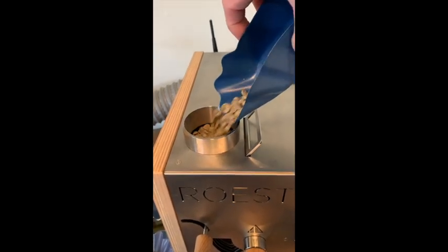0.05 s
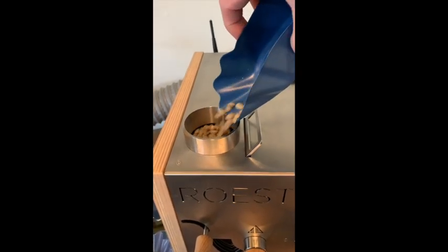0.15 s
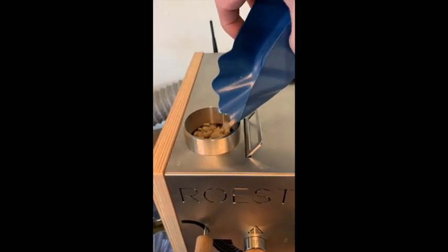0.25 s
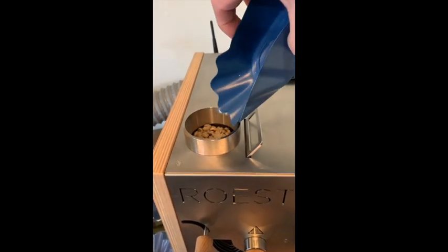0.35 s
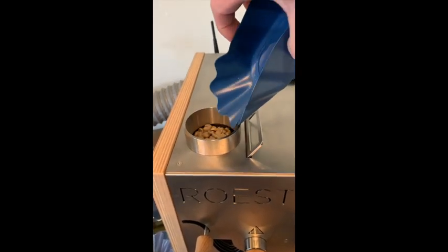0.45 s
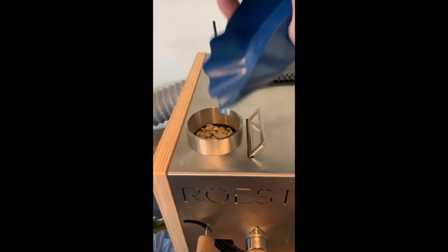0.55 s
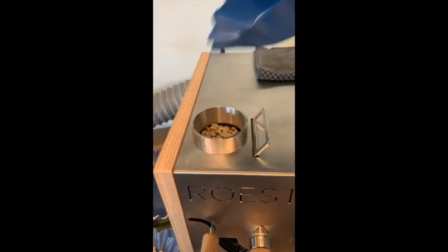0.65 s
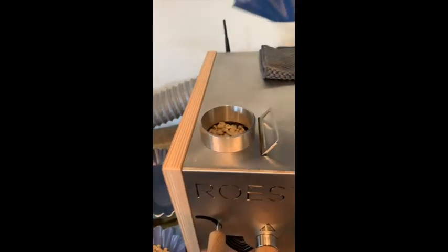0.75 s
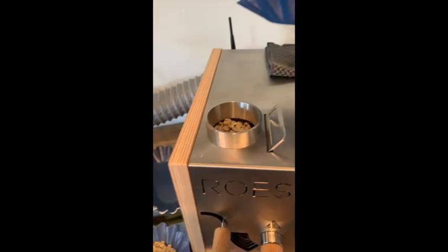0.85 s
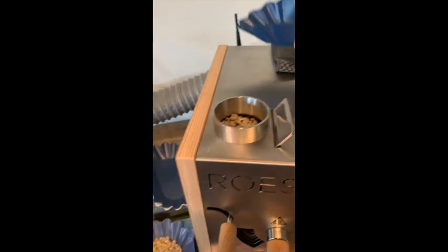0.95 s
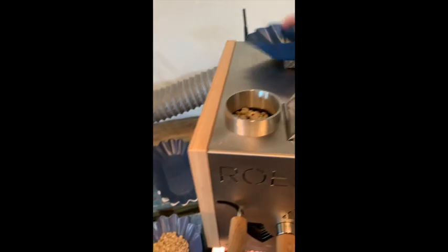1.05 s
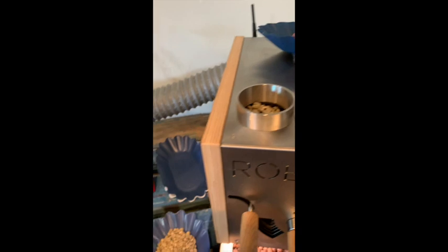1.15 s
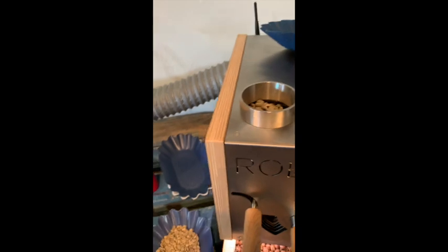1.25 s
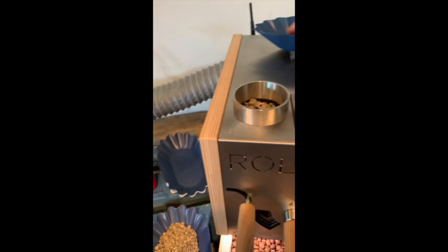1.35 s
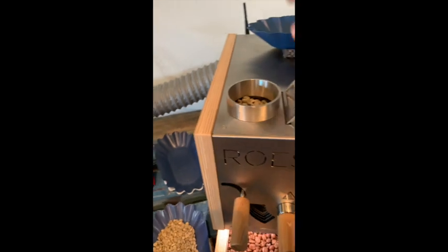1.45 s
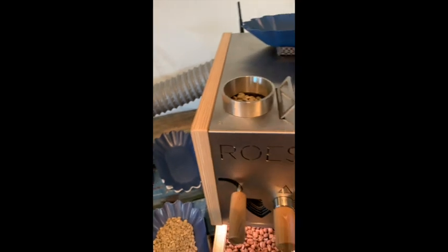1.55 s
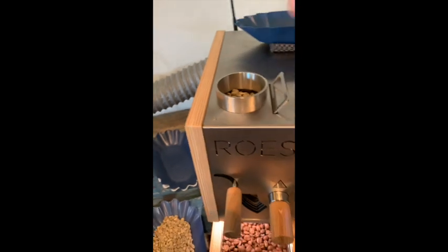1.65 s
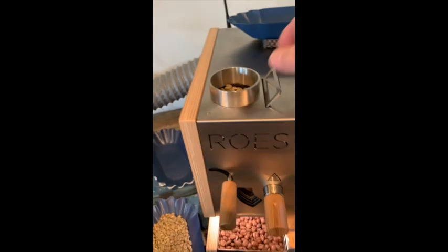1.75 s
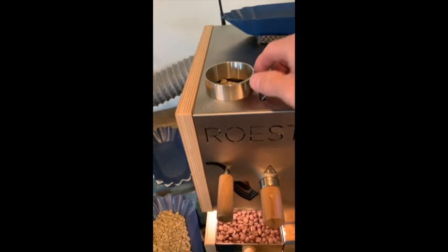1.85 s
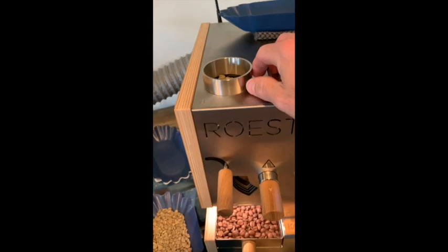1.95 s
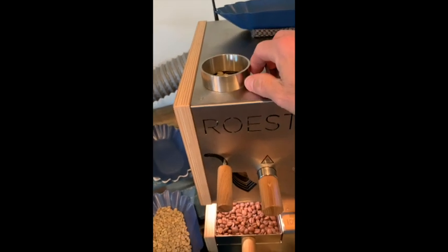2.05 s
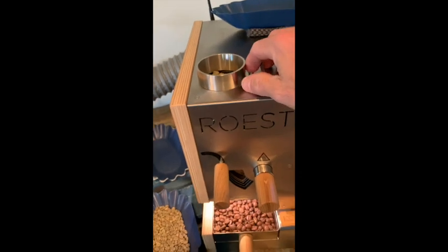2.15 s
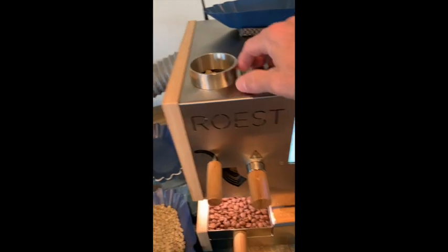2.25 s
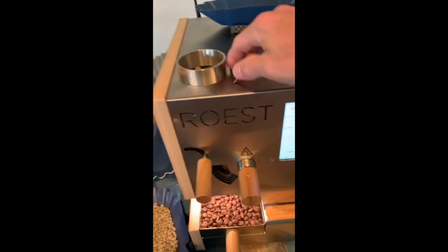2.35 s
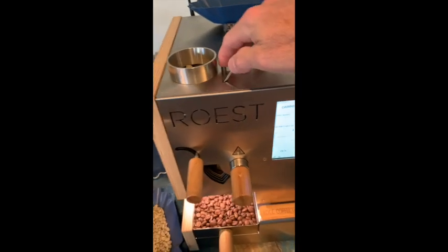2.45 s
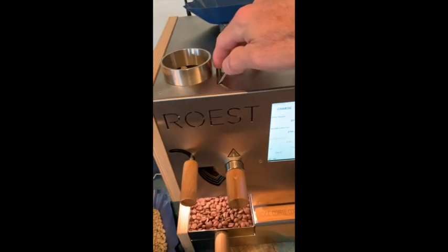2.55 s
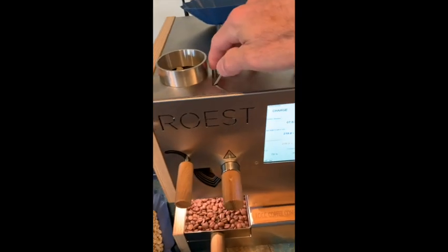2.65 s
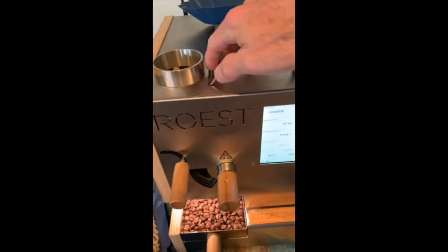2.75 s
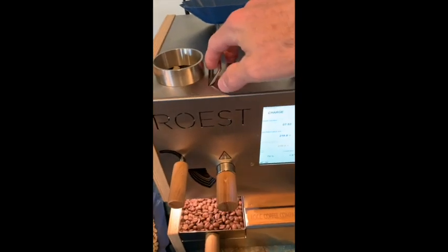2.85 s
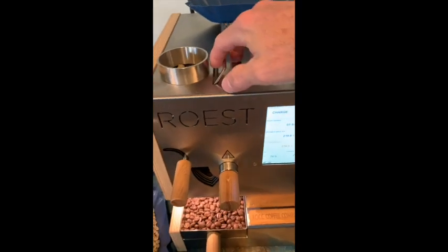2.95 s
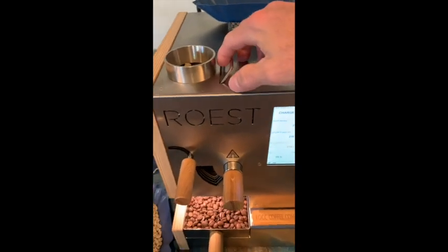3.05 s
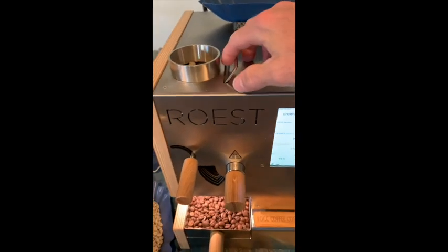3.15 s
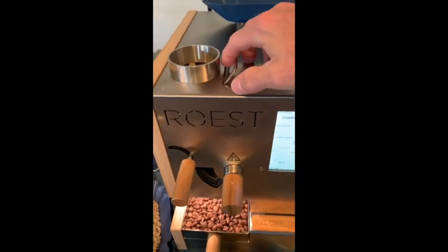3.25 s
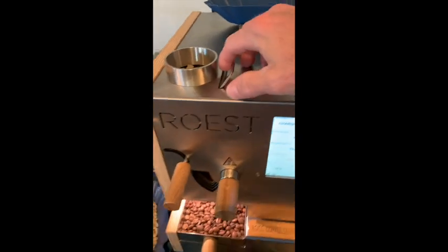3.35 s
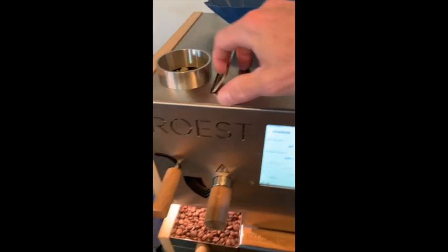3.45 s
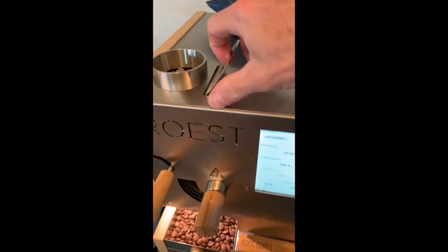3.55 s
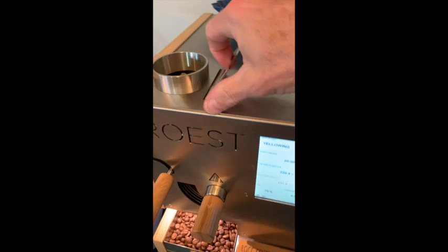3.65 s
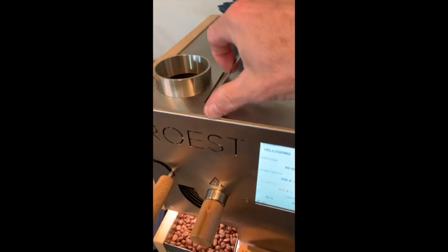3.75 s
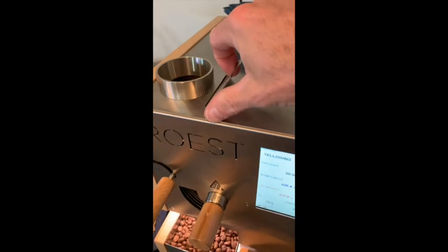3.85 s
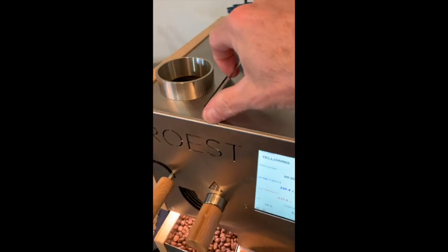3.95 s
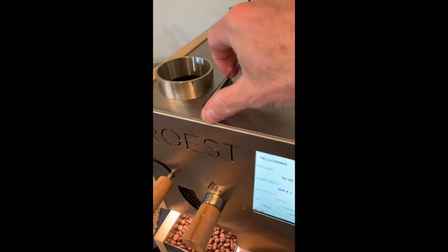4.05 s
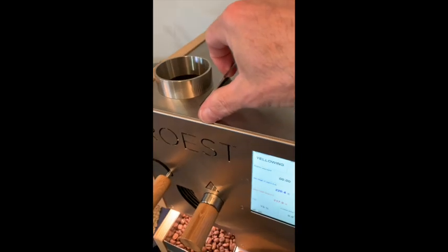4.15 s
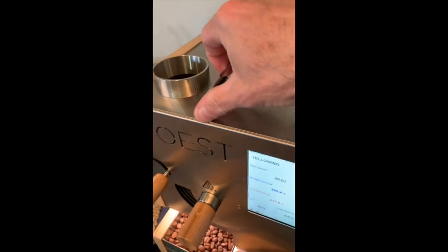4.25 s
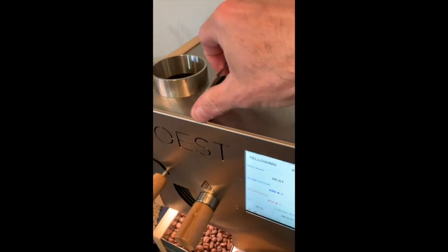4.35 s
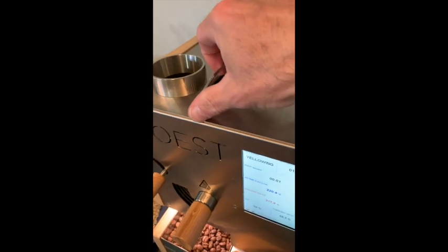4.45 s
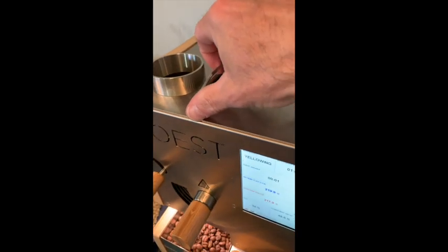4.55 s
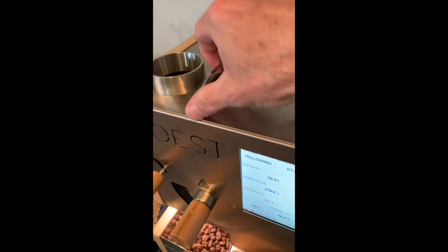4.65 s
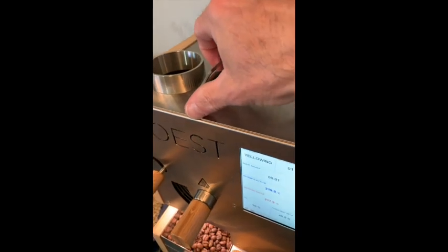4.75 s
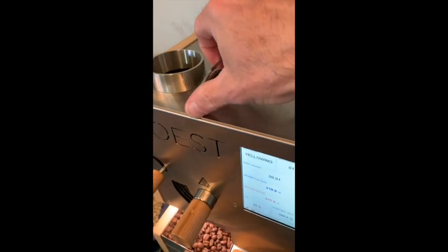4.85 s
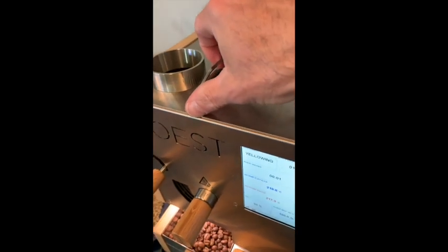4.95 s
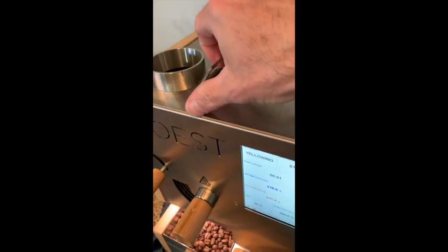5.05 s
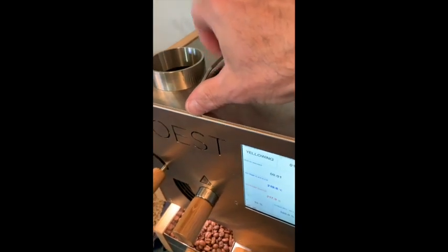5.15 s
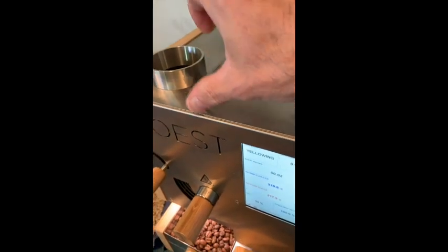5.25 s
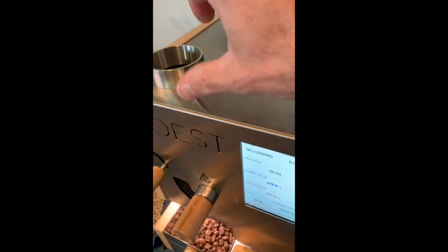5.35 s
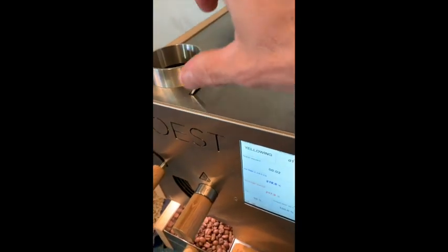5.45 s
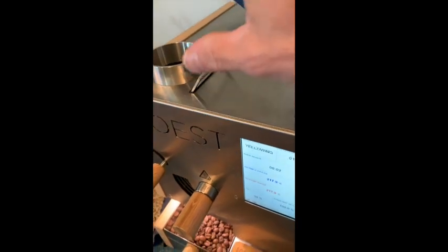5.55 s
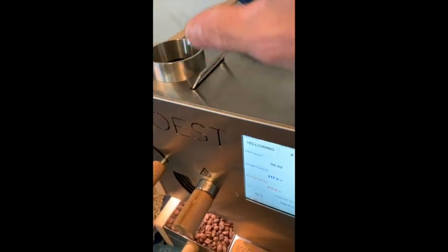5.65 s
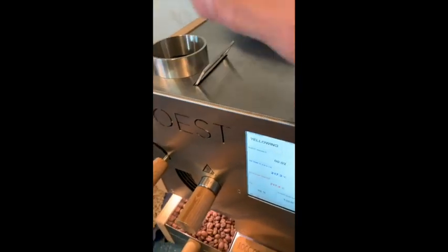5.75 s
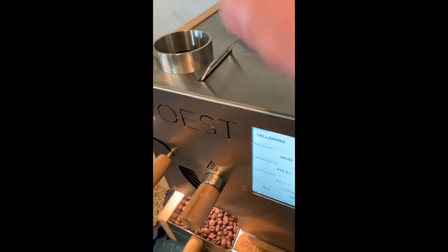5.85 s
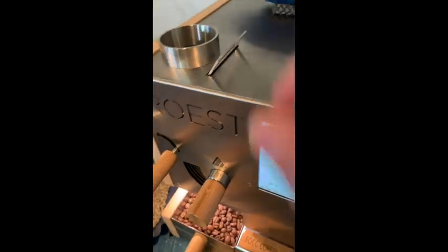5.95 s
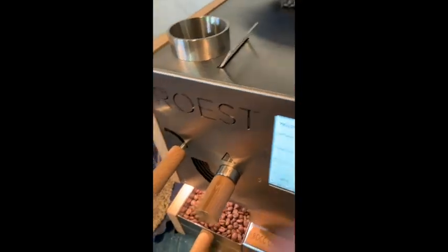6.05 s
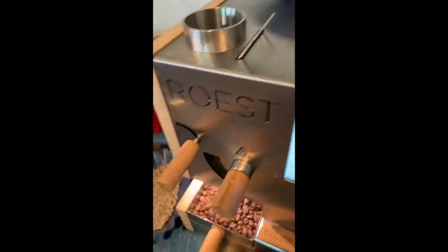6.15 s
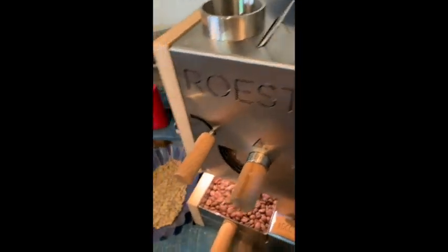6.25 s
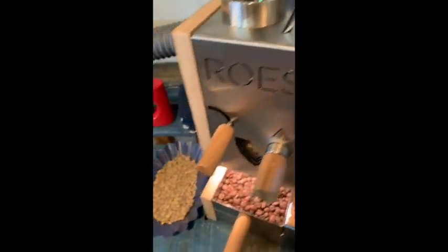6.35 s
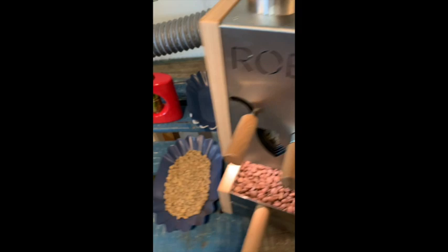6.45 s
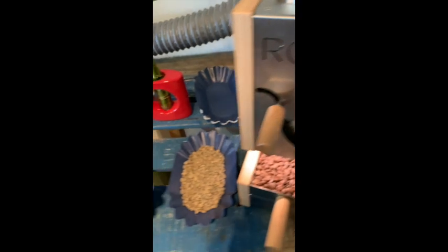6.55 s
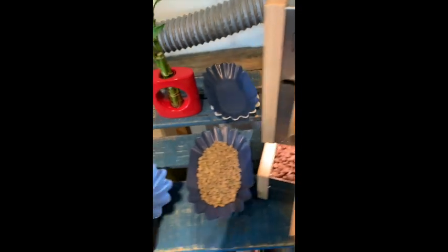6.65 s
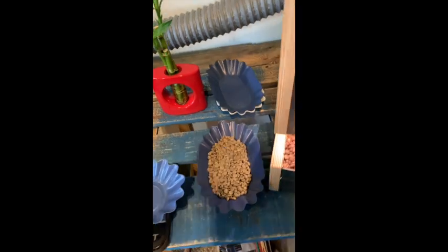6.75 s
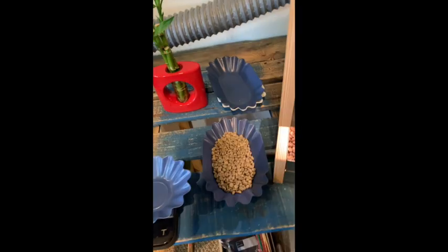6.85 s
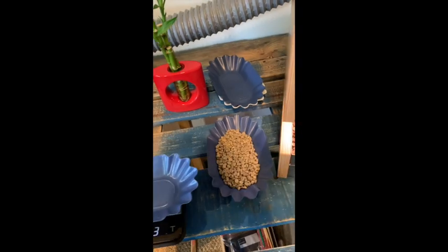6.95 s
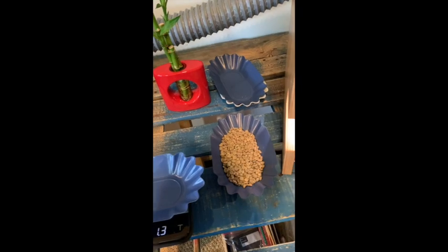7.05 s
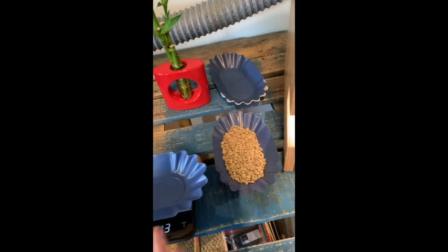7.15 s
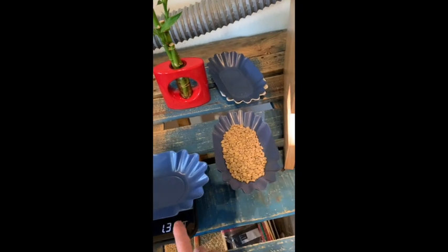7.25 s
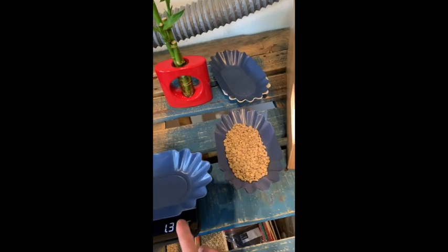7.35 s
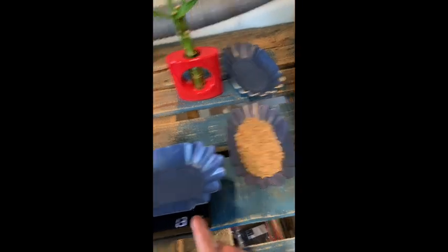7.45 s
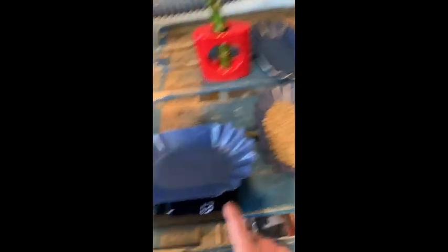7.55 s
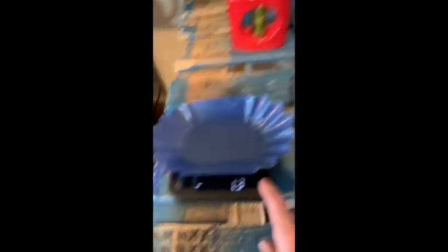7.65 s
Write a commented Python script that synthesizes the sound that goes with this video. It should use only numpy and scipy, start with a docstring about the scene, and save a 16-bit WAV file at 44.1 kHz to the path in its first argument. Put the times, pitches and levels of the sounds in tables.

```python
"""Green coffee beans slide from a tray into the steel hopper of a small roaster, ticking and ringing it.
The tray is put down, a lever clacks the hopper's flap open and the beans rush down the chute.
The flap snaps shut with a bounce while the beans tumble in the turning drum.
Underneath, the motor hums and the fan blows, all close to a pair of microphones."""
import sys
import numpy as np
from scipy import signal
from scipy.fft import rfft, irfft, next_fast_len
from scipy.io import wavfile
from scipy.ndimage import map_coordinates

SR = 44100
rng = np.random.default_rng(int(sys.argv[2]) if len(sys.argv) > 2 else 0)


def waveform_to_disk(signal):
    """Save audio, clipped to [-1, 1], as 16-bit WAV at the path in sys.argv[1]."""
    frames = np.transpose(np.atleast_2d(signal))
    scaled = np.clip(frames, -1, 1) * 32767
    samples = np.round(scaled).astype(np.int16)
    wavfile.write(sys.argv[1], SR, samples)


N = 340447
TIME = np.arange(N) / SR
TAIL = TIME[:SR // 2]  # time axis of one hit


def beans():
    """Beans pass through hopper, chute and drum; the thin steel inside sizzles as they hit it."""
    # first slip, main drop, surges and a last clump: t/s, length/s, level/dB
    drops = [(3.55, 0.1, -48), (3.634, 0.73, -27.7), (3.672, 0.02, -31), (3.765, 0.085, -29),
             (4.455, 0.015, -36.5)]
    sizzle_modes = [(7835, 50, -2), (8030, 100, 1), (8430, 170, 0), (8650, 100, -3)]  # thin steel: f/Hz, width/Hz, level/dB
    chute_flow = swells(drops, rise_s=0.016, release_s=0.34) * amp(1.1 * wobble(30))
    rustle_flow, ping_flow, sizzle_flow = tumbling(start_s=drops[0][0])
    steel = resonant(contacts(per_second=1200, spread_db=1.5), sizzle_modes)
    sizzle = (amp(-5) * chute_flow + sizzle_flow) * steel
    return hopper() + chute(chute_flow) + drum(rustle_flow, ping_flow) + sizzle


def hopper():
    """Beans slide off the tray and the last few settle; the harder hits ping the hopper."""
    pours = [(0.0, 0.16, 0.0013, -34.5), (0.512, 0.17, 0.07, -53)]  # two runs of beans: t/s, length/s, rise/s, level/dB
    colour = [(350, -40), (700, -17), (1300, -4), (1900, 0), (2250, -1), (2750, -11), (3500, -2.5),
              (4200, -3), (6400, -5.5), (7500, -11), (9300, -9), (11000, -13), (15000, -13.5)]  # patter spectrum: f/Hz, level/dB
    wall_modes = [(1545, 40, -2.5), (1850, 37, 1), (2024, 50, -2)]  # hopper steel: f/Hz, width/Hz, level/dB
    flow = sum(swell(s, length, db, rise, release_s=0.46) for s, length, rise, db in pours)
    patter = rattle(flow, colour, per_second=1800, spread_db=1, ring_t60=0.055, ring_db=3, gain_db=3)
    pings = amp(-2) * flow * resonant(contacts(per_second=600, spread_db=0), wall_modes)
    return patter + pings


def chute(flow):
    """A dense stream of beans rushes down and pings the chute wall; the emptying hopper booms."""
    colour = [(140, -24), (280, -18), (400, -2), (500, -20), (750, -15), (1150, -7), (1400, -10),
              (1800, -5), (3200, -3), (3800, -1.5), (4500, -4), (6400, -1.5), (7300, -3.5), (9000, -2.5),
              (11400, -2), (12400, -5), (15000, -5.5)]  # bright rush: f/Hz, level/dB
    wall_modes = [(1784, 29, 2), (2526, 100, 4), (3230, 46, 2), (6230, 91, 6.5), (6500, 34, 0)]  # chute steel: f/Hz, width/Hz, level/dB
    boom_swell = [(3.63, 0.074, -36)]  # hollow boom: t/s, length/s, level/dB
    rush = rattle(flow, colour, per_second=4000, spread_db=1.6, ring_t60=0.06, ring_db=4, gain_db=3.2)
    pings = amp(-8.5) * flow * resonant(contacts(per_second=160, spread_db=1.5), wall_modes)
    hollow = resonant(contacts(per_second=600, spread_db=7), [(497.6, 7, 0)])
    return rush + pings + swells(boom_swell, rise_s=0.071, release_s=1) * hollow


def drum(flow, ping_flow):
    """Tumbling beans rustle; the harder hits ring single modes of the drum wall."""
    colour = [(350, -66), (700, -8), (1300, -6), (2000, -3), (3000, -2.5), (4000, -2), (4600, -4.5),
              (5500, -1), (6500, -1), (7400, -3), (9500, -4), (10500, -2), (11000, -4), (11700, -2),
              (12800, -6), (15000, -7)]  # rustle spectrum: f/Hz, level/dB
    wall_modes = [(2660, 90, -3), (3320, 120, -4), (3520, 110, 1), (3700, 100, 0), (4040, 130, -1),
                  (5480, 200, -6)]  # drum steel: f/Hz, width/Hz, level/dB
    rustle = rattle(flow, colour, per_second=1900, spread_db=2.4, ring_t60=.055, ring_db=3, gain_db=3.9)
    return rustle + ping_flow * resonant(contacts(per_second=450, spread_db=2), wall_modes)


def tumbling(start_s):
    """Envelopes of the drum's rustle, pings and sizzle: clumpy spills over a bed of rolling beans."""
    # the drum lifts and spills about twice a second: t/s, rise/s, length/s, rustle/dB, pings/dB, sizzle/dB
    spills = [(4.6, .12, .36, -43.5, -53, -47.5), (5.0, .06, .24, -37.5, -46, -37),
              (5.125, .02, .11, -38, -46, -40), (5.38, .1, .13, -44, -51, -51),
              (5.53, .04, .39, -38, -49, -41), (5.61, .015, .07, -40, -56, -42),
              (6.0, .06, .27, -38.5, -45, -40), (6.075, .015, .1, -36.5, -45, -39),
              (6.28, .02, .1, -41, -47, -50), (6.463, .05, .3, -39.5, -45, -45),
              (6.585, .01, .1, -41, -48, -48), (6.8, .03, .1, -44, -48, -56),
              (6.935, .025, .33, -42, -47, -49), (7.08, .02, .15, -41.5, -48, -48),
              (7.28, .02, .12, -42.5, -47, -50), (7.515, .045, .17, -38, -40.5, -42.5)]
    bed_db = [-52, -50, -59]  # rolling beans: rustle/dB, pings/dB, sizzle/dB
    shapes = np.array([swell(s, length, 0, rise, release_s=.34, sag_db_per_s=14, bend=0.56)
                       for s, rise, length, *_ in spills])
    gains = amp(np.array(spills)[:, 3:].T)
    spilling = np.sqrt(gains ** 2 @ shapes ** 2)
    bed = amp(bed_db)[:, None] * (TIME > start_s)
    return amp(1.1 * wobble(25)) * np.hypot(spilling, bed)


def stray_beans():
    """Single beans tick brightly on steel; the hardest clang at a pitch set by the spot they hit."""
    skips = [(0.033, -30), (0.202, -32), (0.2329, -28), (0.2524, -31), (0.276, -32), (4.043, -18),
             (4.2785, -20), (4.4184, -26), (4.44, -24), (4.4752, -21), (4.4994, -22), (4.594, -34),
             (4.617, -33), (4.645, -31), (4.9681, -28), (5.055, -24), (5.497, -31), (5.846, -26),
             (5.875, -26), (5.998, -32), (6.298, -27), (6.466, -33), (6.598, -27), (6.741, -29), (7.1, -31),
             (7.386, -31), (7.437, -35), (7.452, -34), (7.4844, -30)]  # skipping beans: t/s, level/dB
    clangs = [(0.0403, -30, 1860), (0.0553, -29, 2020), (0.0662, -26, 1860), (0.1067, -27, 1860),
              (0.2019, -29, 1860), (3.643, -27, 2490), (3.8247, -25, 2490), (3.9359, -24.5, 2490),
              (3.9579, -25, 2490), (4.025, -23.5, 2490), (4.0813, -29, 2490), (4.1262, -23, 2490),
              (4.1986, -30, 2490), (6.5205, -34, 3500), (6.592, -33, 3500), (6.6687, -38, 3500),
              (7.0413, -38, 3500), (7.386, -38, 3500), (7.4843, -39, 3500), (7.5437, -35, 3690),
              (7.562, -33, 3690), (7.625, -35, 3690)]  # hard hits on hopper, chute and drum: t/s, level/dB, f/Hz
    clang_modes = [(1, -3, .08), (1.052, -8, .06)]  # a close pair: pitch ratio, level/dB, t60/s
    colour = [(800, -4), (3000, -8.5), (7000, 3), (15000, 0.5)]  # f/Hz, level/dB
    decay = [(2000, 0.082), (12000, 0.039)]  # f/Hz, t60/s
    out = np.zeros((2, N))
    for s, db in skips:
        add(out, s, amp(db - 6) * knock(colour, decay, rise_s=0.00036))
    for s, db, hz in clangs:
        modes = [(ratio * hz, mode_db, t60) for ratio, mode_db, t60 in clang_modes]
        add(out, s, amp(db) * ring(modes)[None])
    return out


def flap():
    """The lever scrapes; each blow of the flap chatters and rings housing, plate, lid, lever and room."""
    # the flap hits its open stop and rattles; later it catches, snaps shut and bounces:
    # t/s, level/dB, housing/dB, plate/dB, lid/dB, lever/dB
    blows = [(3.519, -12.7, -23.5, -27, -14.5, -54), (3.533, -29, -31, -29, -34, -56),
             (3.565, -36, -39, -33, -41, -56), (5.222, -24, -46, -51, -44, -55),
             (5.229, -14.2, -34, -28.5, -17, -19.5), (5.278, -22, -42, -32.5, -31, -35)]
    chatter = [(0, 4), (.0045, 1.5), (0.014, -18)]  # three quick contacts per blow: delay/s, level/dB
    colour = [(60, -27), (130, -10), (350, -7.5), (700, -4.5), (950, -3.5), (1550, 0.5), (2200, 1.5),
              (4000, -1.5), (6500, -2), (11000, -4.5), (15000, -6)]  # clack spectrum: f/Hz, level/dB
    decay = [(200, .1), (700, .17), (1200, .14), (2000, .12), (4000, .09), (14000, .065)]  # clack tail: f/Hz, t60/s
    room_decay = [(300, 0.3), (3000, .32), (14000, .2)]  # f/Hz, t60/s
    # modes of the housing, the flap's plate, the steel lid and the thin lever: f/Hz, level/dB, t60/s
    housing = [(118, -5, .15), (195, -4, .1), (236, -4, .22), (283, -5, .3), (362, 1, .1), (387, 0, .12),
               (432, -4, .2), (500, -2, .25), (524, -5, .22)]
    plate = [(694, -5, .18), (713, 0, .24)]
    lid = [(1184, -17, .2), (1292, -17, .18), (1562, 0, .065), (1668, -5, .11), (2004, -17, .16),
           (2120, -11, .1)]
    lever = [(4485, 0, .1), (4937, 0, .1), (5195, -3, .12), (5528, -12, .52), (5705, -5, .17),
             (5790, -5, .14), (6320, -5, .17), (6440, -5, .15), (6780, -7, .15)]
    strokes = [(3.44, .13, -41), (5.11, .11, -38)]  # the lever is pulled, then slips back: t/s, length/s, level/dB
    scrape_colour = [(500, 1), (2000, -2), (6500, -5), (10000, -13), (15000, -17)]  # lever friction: f/Hz, level/dB
    scrape = swells(strokes, rise_s=0.084, release_s=0.86)
    out = rattle(scrape, scrape_colour, per_second=4700, spread_db=1, ring_t60=.041, ring_db=-3, gain_db=4)
    for s, db, *parts_db in blows:
        steel = sum(amp(level) * ring(part) for level, part in zip(parts_db, (housing, plate, lid, lever)))
        room = amp(db - 23) * knock(colour, room_decay)
        add(out, s, steel + room)
        for delay, contact_db in chatter:
            add(out, s + delay, amp(db + contact_db) * knock(colour, decay, crack_db=6.5))
    return out


def tray():
    """The empty tray slides over the lid, clattering and ringing briefly as it is put down."""
    slides = [(0.885, .075, -42), (1.025, 0.19, -40.5)]  # before and after it lands: t/s, length/s, level/dB
    touches = [(0.958, -43, -29), (1.0479, -20.5, -25), (1.052, -45, -22), (1.06, -38, -45),
               (1.072, -37.5, -25.5)]  # tray on lid: t/s, knock/dB, ring/dB
    colour = [(175, -33), (350, -1), (700, -14.5), (1100, -9.5), (1530, 1), (2300, -13), (3500, -11),
              (6500, -15.5), (11000, -22), (15000, -21)]  # clatter spectrum: f/Hz, level/dB
    decay = [(300, 0.12), (1500, 0.11), (5000, 0.09), (14000, 0.085)]  # clatter tail: f/Hz, t60/s
    modes = [(390, -9, .07), (1310, -10, .05), (1414, -2, .05), (1520, -3, .05), (1650, -3, .05),
             (2050, -11, .04), (3900, -13, .04), (8600, -13, .04)]  # tray body: f/Hz, level/dB, t60/s
    slide = swells(slides, rise_s=0.018, release_s=0.71, sag_db_per_s=36)
    out = rattle(slide, colour, per_second=1300, spread_db=-3, ring_t60=0.13, ring_db=-2, gain_db=-0.5)
    for s, db, ring_db in touches:
        add(out, s, amp(db) * knock(colour, decay, rise_s=0.0012) + amp(ring_db) * ring(modes))
    return out


def motor():
    """A low hum whose partials follow the motor's speed and beat against each other."""
    speed = [(0, 50.7), (.35, 50.2), (.6, 47.8), (.9, 44.5), (1.35, 43.8), (2.2, 46.2), (2.75, 43.9),
             (3.3, 43.1), (4.35, 43.5), (5, 42.2), (7.72, 41.6)]  # hum pitch: t/s, f/Hz
    partials = [(1.37, 1), (1.63, 1.5), (2, -11), (2.38, -3.5), (2.51, -9), (2.63, -3.5)]  # overtones: pitch ratio, level/dB
    fade = [(0.0, -43.5), (3.6, -44), (5.0, -49.5), (7.72, -52.5)]  # overtones fade as the microphones move round the roaster: t/s, level/dB
    pitch = curve(speed)
    fundamental_db = -46.5 + 2 * (pitch - 43.9)  # louder as the motor runs faster
    phase = 2 * np.pi * np.cumsum(pitch) / SR
    overtones = sum(amp(db) * np.sin(ratio * phase + 0.45 * wobble(5)) for ratio, db in partials)
    return np.sqrt(2) * (amp(fundamental_db) * np.sin(phase) + amp(curve(fade) - 0.35) * overtones)


def fan():
    """Air rushes through the cabinet with a few unsteady tones; the hopper's throat resounds while open."""
    air_level = [(0.0, -40.5), (3.1, -40), (4.5, -38.5), (7.72, -41)]  # draught: t/s, level/dB
    air_colour = [(30, -26.5), (60, -1.5), (150, -8), (300, -2), (500, -8), (780, -11.5), (1100, -12),
                  (1900, -15), (2600, -23), (4200, -26.5), (6300, -35.5), (7500, -49), (15000, -82)]  # broad rush: f/Hz, level/dB
    cabinet_modes = [(63.3, 7.1, 1), (114, 8.8, -1), (216.4, 31.4, -5.5), (283.8, 28.3, -3.5),
                     (381.2, 30, -3.5), (503.7, 38.4, -5), (1111, 89, -11)]  # hollows that the draught excites: f/Hz, width/Hz, level/dB
    fan_tones = [(296, -51.5), (409.1, -46), (1502, -60), (1935, -60), (2750, -66.5)]  # steady-level tones: f/Hz, level/dB
    whine_level = [(0.0, -58.5), (1.12, -59), (1.89, -48), (2.62, -48.5), (3.2, -56.5), (6.26, -54),
                   (6.92, -60), (7.72, -58.5)]  # swelling whine: t/s, level/dB
    opening = [(3.6, 1.58, -37.5)]  # draught grows as the open hopper empties: t/s, length/s, level/dB
    throat_modes = [(284.4, 8.2, 2.5), (364, 56, -15), (500, 14, -31)]  # the hopper's air resonances: f/Hz, width/Hz, level/dB
    air = unit(coloured(noise(N), air_colour)) + resonant(noise(N), cabinet_modes)
    draught = amp(curve(air_level) + 0.5 + 0.16 * wobble(9)) * air
    tone = lambda hz: np.sqrt(2) * np.sin(2 * np.pi * hz * TIME + 0.31 * wobble(7))
    tones = sum(amp(db) * tone(hz) for hz, db in fan_tones)
    whine = amp(curve(whine_level) + np.array([[-2], [7]])) * tone(904.4)  # leans right
    throat_flow = swells(opening, rise_s=0.78, release_s=0.18, sag_db_per_s=4.5)
    return draught + tones + whine + throat_flow * resonant(noise(N), throat_modes)


def rattle(flow, colour, per_second, spread_db, ring_t60, ring_db, gain_db):
    """A stream of small contacts; each ticks and rings the steel around it."""
    ticks = contacts(per_second, spread_db)
    steel = amp(ring_db) * wall_ringing(ticks, ring_t60)
    return amp(gain_db) * flow * unit(coloured(ticks + steel, colour))


def contacts(per_second, spread_db):
    """Impulses at random moments; a positive spread makes a few of them hard."""
    force = amp(spread_db * np.minimum(rng.exponential(size=N), 4)) * rng.choice([-1, 1], N)
    return (force * (rng.random(N) < per_second / SR))[None]


def wall_ringing(ticks, t60):
    """Each tick rings the steel in dense modes: some stay, the others change with the spot that is hit."""
    size = 2048  # samples per spot
    count = N // size + 1
    blocks = np.pad(ticks, ((0, 0), (0, count * size - N))).reshape(1, count, size)
    spots = noise(count * size).reshape(2, count, size)
    walls = (spots + amp(-1) * noise(size)[:, None]) * amp(-60 * TIME[:size] / t60)
    walls /= np.linalg.norm(walls[0], axis=1)[:, None]
    rung = irfft(rfft(blocks, 2 * size) * rfft(walls, 2 * size))
    heads, tails = rung[..., :size].reshape(2, -1), rung[..., size:].reshape(2, -1)
    return heads[:, :N] + np.pad(tails, ((0, 0), (size, 0)))[:, :N]


def knock(colour, decay, crack_db=0, rise_s=0.0005):
    """One contact: a crack, then dense modes dying band by band; rms 1 over its first 5 ms."""
    crack = amp(crack_db - 60 * TAIL / 0.013) * noise(len(TAIL))
    hz, t, bands = signal.stft(noise(len(TAIL)), SR, nperseg=128)
    bands *= amp(-60 * t / along(decay, hz)[:, None])
    body = signal.istft(bands, SR, nperseg=128)[1][:, :len(TAIL)]
    sound = coloured((crack + body) * (1 - np.exp(-TAIL / rise_s)), colour)
    return sound / np.std(sound[:, :SR // 200])


def ring(modes):
    """Modes (f/Hz, level/dB, t60/s) struck at random strengths and phases."""
    hz, level, t60 = np.transpose(modes)[:, :, None]
    strength = level + 2 * rng.standard_normal(hz.shape)
    return (amp(strength - 60 * TAIL / t60) * np.sin(2 * np.pi * (hz * TAIL + rng.random(hz.shape)))).sum(0)


def resonant(x, modes):
    """x through resonances (f/Hz, width/Hz, level/dB) of alternating polarity, at rms 1."""
    def response(f):
        return sum((-1) ** k * amp(db) * 1j * f * width / (hz * hz - f * f + 1j * f * width)
                   for k, (hz, width, db) in enumerate(modes))
    return unit(filtered(x, response))


def noise(size):
    """Stereo white noise, as alike on both sides as a sound field at the microphones."""
    likeness = [(100, .999), (400, .96), (900, .55), (1700, .9), (2800, .55), (4500, .92), (15000, .9)]  # left against right: f/Hz, correlation
    def mid_side_gains(hz):
        angle = np.arccos(np.clip(along(likeness, hz), 0, 1)) / 2
        return np.array([np.cos(angle), np.sin(angle)])
    mid, side = filtered(rng.standard_normal((2, size)), mid_side_gains)
    return np.array([mid + side, mid - side])


def swell(s, length, db, rise_s, release_s, sag_db_per_s=0, bend=1):
    """Gain that rises (abruptly if bend is under 1), sags while it holds, then falls 60 dB in release_s."""
    t = TIME - s
    fall_db = sag_db_per_s * np.maximum(t - rise_s, 0) + 60 * np.maximum(t - length, 0) / release_s
    return amp(db - fall_db) * np.clip(t / rise_s, 0, 1) ** bend


def swells(rows, rise_s, release_s, sag_db_per_s=0):
    """Swells (t/s, length/s, level/dB) of one shape, added in power."""
    return np.linalg.norm([swell(*row, rise_s, release_s, sag_db_per_s) for row in rows], axis=0)


def coloured(x, colour):
    """Minimum-phase EQ through the points (f/Hz, level/dB)."""
    size = 4096
    cepstrum = irfft(np.log(amp(along(colour, np.fft.rfftfreq(size, 1 / SR)))))
    cepstrum[1:size // 2] *= 2
    cepstrum[size // 2 + 1:] = 0
    return signal.fftconvolve(x, irfft(np.exp(rfft(cepstrum)))[None], axes=1)[:, :x.shape[1]]


def filtered(x, response):
    """x through a complex frequency response."""
    size = next_fast_len(x.shape[-1] + 8192, real=True)
    return irfft(rfft(x, size) * response(np.fft.rfftfreq(size, 1 / SR)), size)[..., :x.shape[-1]]


def wobble(rate):
    """A smooth random curve, rate knots a second."""
    return map_coordinates(rng.standard_normal(int(N * rate / SR) + 4), [TIME * rate / SR])


def curve(points):
    """Automation through (t/s, value) points."""
    return np.interp(TIME, *np.transpose(points))


def along(points, hz):
    """Points (f/Hz, value) read on a log axis."""
    f, value = np.transpose(points)
    return np.interp(np.log(hz + 1), np.log(f + 1), value)


def add(track, s, sound):
    """Mix a sound in at time s."""
    part = track[:, round(s * SR):][:, :sound.shape[1]]
    part += sound[:, :part.shape[1]]


def amp(db):
    """Decibels to gain."""
    return 10 ** (np.asarray(db) / 20)


def unit(x):
    """Scale to rms 1."""
    return x / np.sqrt(np.mean(x ** 2) + 1e-20)


def scene():
    """All sounds reach the two microphones with a slight difference in time and level."""
    balance = [(100, 0), (400, -.8), (900, -3.5), (1500, 0), (2100, -.5), (2500, -4.5), (3300, 0)]  # left minus right: f/Hz, level/dB
    lead = [(0, 0), (900, -1.1), (1300, .2), (2200, .2), (4700, np.pi), (9000, 3 * np.pi),
            (13100, 5 * np.pi), (17400, 7 * np.pi)]  # left ahead of right: f/Hz, phase/rad
    dip = amp(-5 * np.exp(-((TIME - 5.35) / 0.068) ** 2))  # hum and fan dip briefly after the flap shuts
    mix = beans() + stray_beans() + tray() + flap() + dip * (motor() + fan())
    sides = np.array([[.5], [-.5]])
    def microphones(hz):
        phase = np.interp(hz, *np.transpose(lead))
        return amp(sides * along(balance, hz)) * np.exp(1j * sides * phase)
    return filtered(mix, microphones)


def record(dry):
    """The recorder rounds the highest peaks and cuts the deepest bass and the top of the treble."""
    rounded = dry / (1 + np.abs(dry / .78) ** 4) ** (1 / 4)
    high_cut = lambda hz: np.clip((15900 - hz) / 300 + .5, 0, 1) ** 2
    return filtered(rounded, lambda hz: high_cut(hz) * amp(along([(25, -34), (40, -2)], hz)))


dry = scene()
out = record(dry)
waveform_to_disk(out)
```